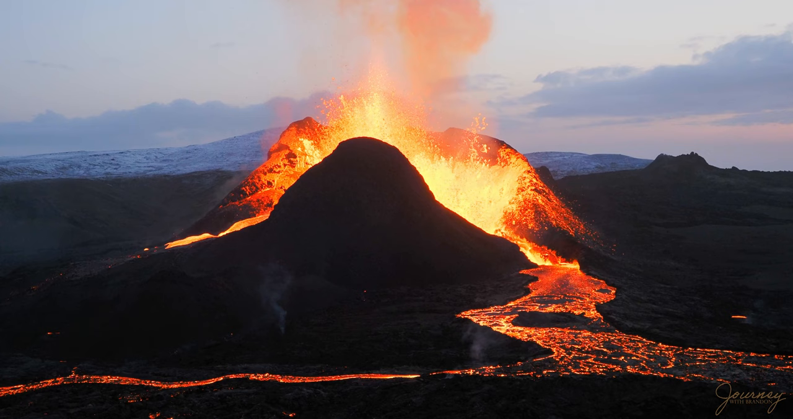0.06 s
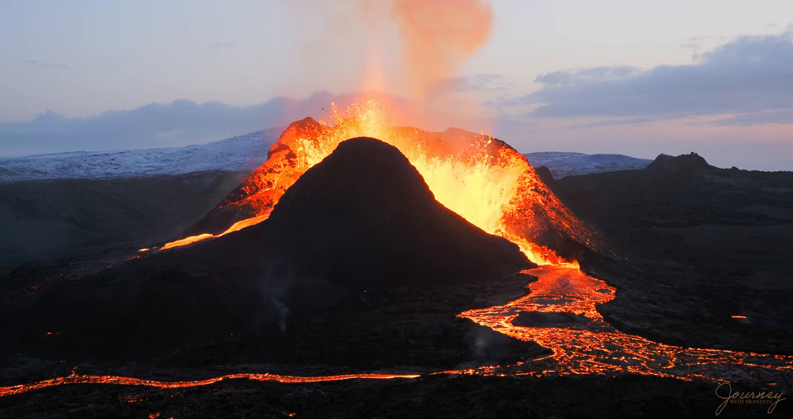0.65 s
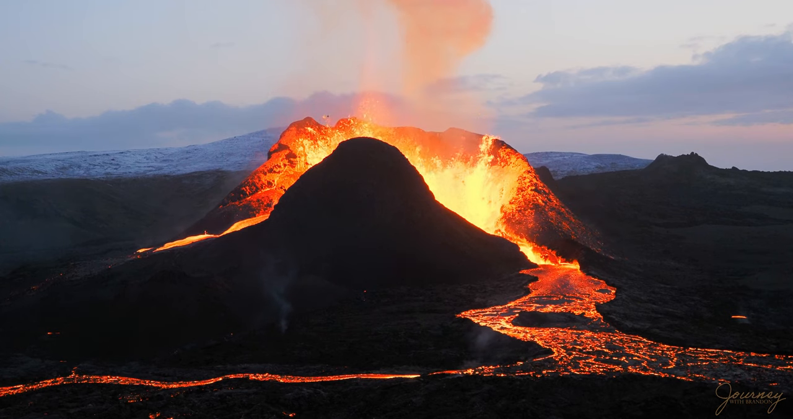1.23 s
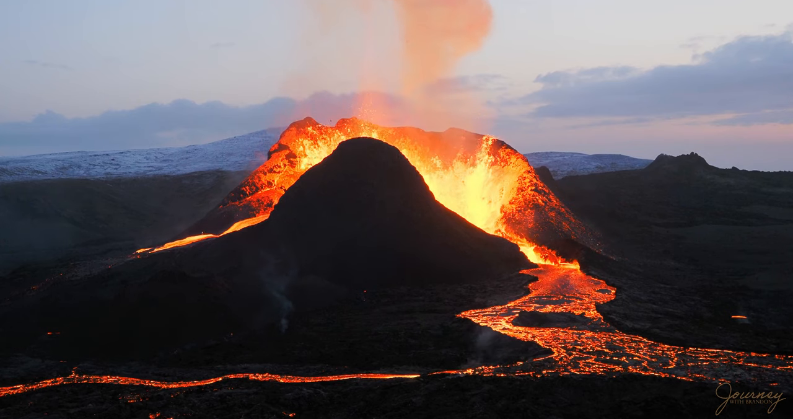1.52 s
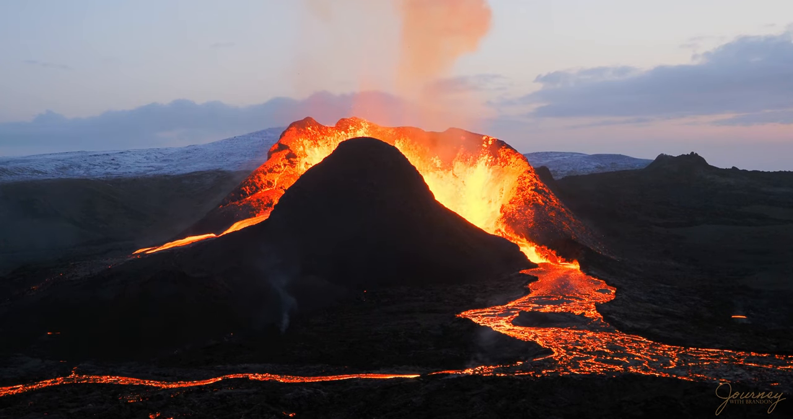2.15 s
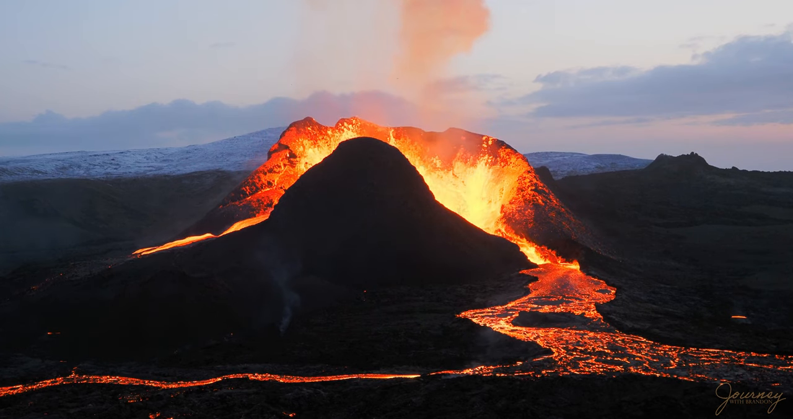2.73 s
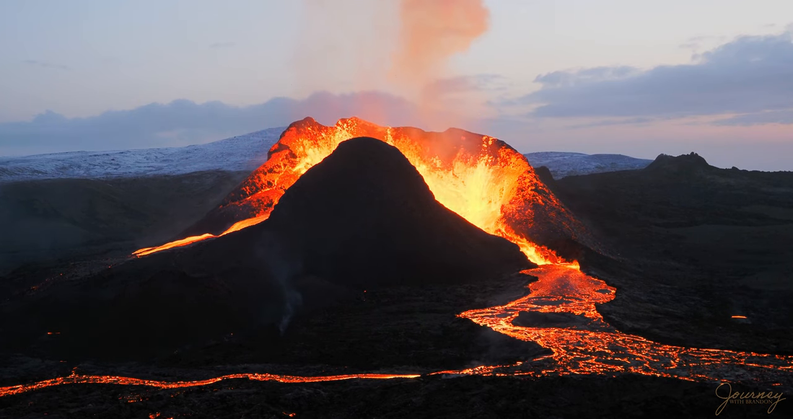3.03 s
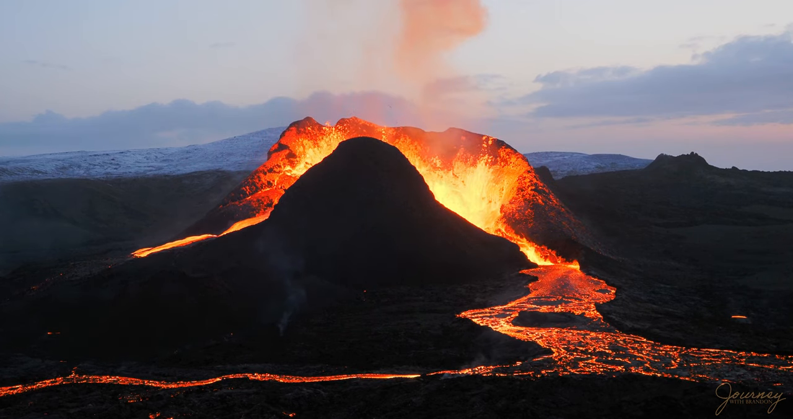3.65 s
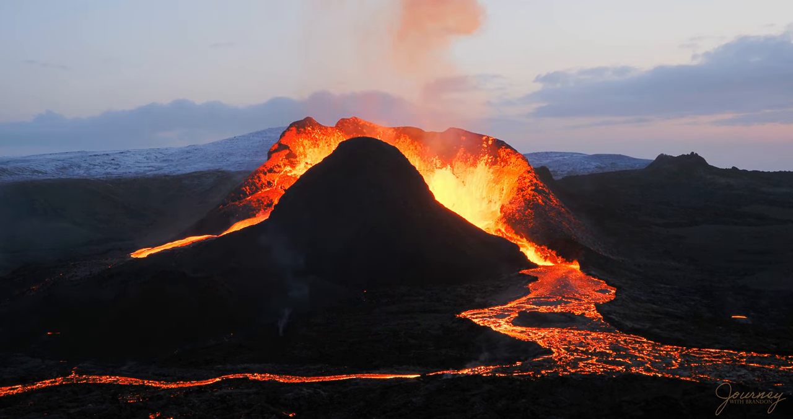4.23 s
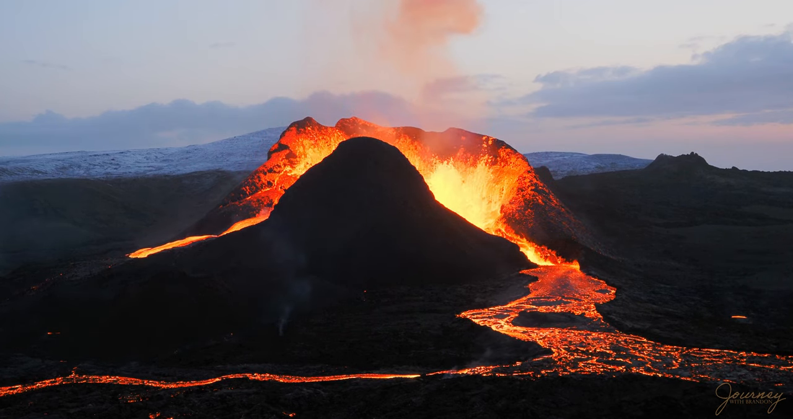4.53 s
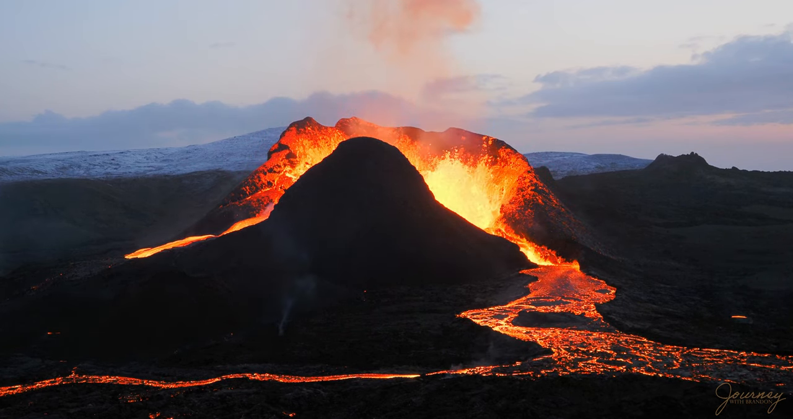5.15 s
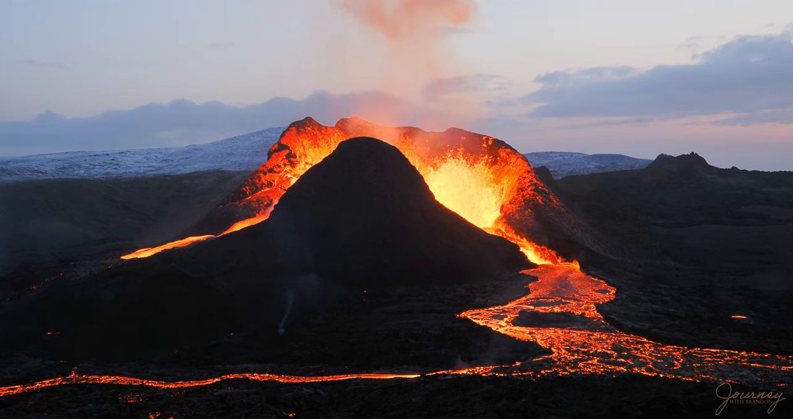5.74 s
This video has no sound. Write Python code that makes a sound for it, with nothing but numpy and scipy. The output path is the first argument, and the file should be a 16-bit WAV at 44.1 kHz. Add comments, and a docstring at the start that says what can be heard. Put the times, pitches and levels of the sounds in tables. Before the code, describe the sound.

Heard from a distance in an open landscape, an erupting volcano gives a continuous low roar of churning lava, booming bubbles and rushing gas. One big bubble thuds early and the eruption swells, then gradually sinks amid softer thuds and slumps. A few gas pockets whoosh out as it briefly rises again late on. Underneath lies a soft lava hiss, with barely audible wind and grit near the microphone.

```python
"""A deep, booming roar comes first: a lava fountain in its crater, far off across open ground. Churning melt
rumbles, countless gas bubbles burst and boom in the vent, and gas rushes above them. Large bubbles thud out
singly, gas pockets whoosh and slabs of melt slump back with a whump. A steadier, higher hiss rides on top of
the gas; close by, light wind sizzles and grit gives a few faint crackles."""
import sys
import numpy as np
from scipy import signal
from scipy.fft import rfft, irfft
from scipy.io import wavfile

SR = 44100
rng = np.random.default_rng(int(sys.argv[2]) if len(sys.argv) > 2 else 0)


def dump_mix(stems):
    """Bounce the given channels to the path in sys.argv[1] as a 16-bit WAV at rate SR."""
    frames = np.atleast_2d(stems).T  # one column per channel
    limited = np.clip(frames, -1, 1)  # hard clip at full scale
    pcm = np.round(limited * 32767).astype(np.int16)
    wavfile.write(sys.argv[1], SR, pcm)


N = 263718
TIME, FREQ = np.arange(N) / SR, np.fft.rfftfreq(N, 1 / SR)


def gain_of(db):
    """Decibels to amplitude."""
    return 10 ** (np.asarray(db) / 20)


def unit_rms(x):
    """Scales to rms 1."""
    return x / np.sqrt(np.mean(x ** 2) + 1e-20)


def eq_db(curve):
    """An EQ curve at every frequency bin, drawn on a log-frequency axis."""
    hz, db = np.transpose(curve)
    return np.interp(np.log(FREQ + 1), np.log(hz + 1), db)


def colour(x, curve):
    """Filters through an EQ curve; rms 1."""
    return unit_rms(irfft(rfft(x) * gain_of(eq_db(curve)), N))


def follow(rows, column=1):
    """One column of an automation table at every sample."""
    rows = np.asarray(rows)
    return np.interp(TIME, rows[:, 0], rows[:, column])


def bump(s, half_width_s):
    """A bell-shaped envelope that peaks at time s."""
    return np.exp(-((TIME - s) / half_width_s) ** 2)


def swelling(s, attack_s, sharpness):
    """An envelope that rises from time s to 1, then sinks."""
    age = np.maximum(TIME - s, 0) / attack_s
    return (age * np.exp(1 - age)) ** sharpness


def wander(rate_hz):
    """Smooth random modulation up to about rate_hz; rms 1."""
    band = np.exp(-(FREQ / rate_hz) ** 2) * (FREQ > rate_hz / 10)
    return unit_rms(irfft(rfft(rng.standard_normal(N)) * band, N))


def pops(per_s, spread_db):
    """Two trains of dense random impulses, most small and a few large."""
    size = gain_of(spread_db * np.minimum(rng.exponential(1, (2, N)), 4))
    polarity = rng.choice([-1, 1], (2, N))
    fires = rng.random((2, N)) < per_s / SR
    return unit_rms(size * polarity * fires)


def resonate(x, hz, width_hz):
    """A resonance of gain 1 that follows the curve hz."""
    turn = np.exp(2j * np.pi * np.cumsum(hz) / SR)
    pole = np.exp(-np.pi * width_hz / SR)
    return 2 * (turn * signal.lfilter([1 - pole], [1, -pole], x / turn)).real


def add(mix, s, sound):
    """Mixes a sound in at time s."""
    part = mix[max(round(s * SR), 0):][:len(sound)]
    part += sound[:len(part)]


# Low-end EQ of the melt, shared with the slumps: f/Hz, relative level/dB
RUMBLE_EQ = [(12, -20.5), (25, -11), (42, -1), (63, -0.5), (100, -2), (150, -2), (215, -11.5), (320, -11.5),
             (700, -51.5), (2000, -92)]
# Fader ride on the rumble: t/s, relative level/dB
RUMBLE_RIDE = [(0, 4), (.4, 5.5), (.7, 7.5), (1.1, 7), (1.5, 5), (1.9, 3.5), (2.25, -0.3), (2.8, -1),
               (3.4, -3), (4.1, -5.2), (4.55, -2.5), (5.25, 0), (5.5, -4), (5.98, -4.5)]
def churn(level_db=-30.0, heave_db=0.5):
    """Heavy melt heaves in the crater: a deep, dense rumble that swells and ebbs."""
    rumble = colour(rng.standard_normal((2, N)), RUMBLE_EQ)
    return rumble * gain_of(level_db + follow(RUMBLE_RIDE) + heave_db * wander(6.7))


# Low-mid body of the bursts: f/Hz, relative level/dB
BOOM_EQ = [(100, -32), (215, -4.5), (275, -0.5), (330, -1), (470, -1.5), (600, -9.5), (900, -22.5),
           (2000, -52), (5000, -93.5)]
# The eruption surges, ebbs and rallies; also drives gas and steam: t/s, melt vigour/dB, gas flow/dB
ERUPTION_ARC = [(0.0, 2.5, 4.5), (0.35, 3, 1.5), (0.65, 7.5, 4.0), (1.35, 7, 4.0), (2.0, 3, -0.5),
                (2.45, 0.9, -1.5), (2.72, 0.5, -1.7), (2.84, 1.5, 0.2), (3.02, 0.5, 0.5),
                (3.12, -2.0, -1.7), (4.05, -6.5, -2.5), (4.5, -4, -0.5), (4.85, -2, -0.5), (5.05, -2.5, 0),
                (5.25, 1, -0.5), (5.5, -3, -1.2), (5.98, -5.0, -3)]
# Accents where clusters of bubbles break together: t/s, extra vigour/dB
CLUSTERS = [(.86, 0.5), (1.05, 1.5), (1.29, 3.5), (1.64, 2), (2.13, 0)]
# The vent's hollow note, gliding as the melt heaves: t/s, f/Hz
VENT_PITCH = [(0, 310), (.55, 296.5), (.88, 319), (1.06, 400), (1.18, 332), (1.31, 333), (1.47, 401),
              (1.75, 287), (1.9, 385), (2.13, 311), (2.3, 397), (2.6, 287), (2.75, 409), (3.0, 441),
              (3.3, 338), (4.3, 302), (5.2, 380), (5.6, 435), (5.98, 406)]
def boil(level_db=-29.0, swell=0.86, hollow=0.46, hollow_growth=0.86, throb_db=-1.2):
    """A swarm of bursting bubbles; the harder they burst, the more the hollow of the vent rings."""
    bursts = colour(pops(per_s=3500, spread_db=1.5), BOOM_EQ)
    accent_db = sum(db * bump(s, half_width_s=0.032) for s, db in CLUSTERS)
    vigour_db = follow(ERUPTION_ARC, column=1) + accent_db
    ring = resonate(bursts, follow(VENT_PITCH), width_hz=45)
    ring_gain = hollow * gain_of(hollow_growth * vigour_db)
    boom = unit_rms((bursts + ring_gain * ring) / np.sqrt(1 + ring_gain))
    return boom * gain_of(level_db + swell * vigour_db + throb_db * wander(55))


# Midrange roar of the gas: f/Hz, relative level/dB
RUSH_EQ = [(100, -26), (215, -11), (400, -1), (560, -2), (800, -0.5), (1050, -5.5), (1330, -8.5),
           (1750, -14), (2200, -22), (2900, -30.5), (3600, -43), (4500, -55.5), (6000, -81), (16000, -100)]
def gas(level_db=-31.0, swell=1.1, flutter_db=0.5):
    """Gas tears through the spray in tiny shocks; distance takes the treble."""
    rush = colour(pops(per_s=8000, spread_db=2.0), RUSH_EQ)
    flow_db = follow(ERUPTION_ARC, column=2)
    return rush * gain_of(level_db + swell * flow_db + flutter_db * wander(22))


# Upper-mid presence of the steam: f/Hz, relative level/dB
STEAM_EQ = [(500, -12), (2000, 4), (2900, -3.5), (3600, -11), (4500, -20), (5500, -28), (7500, -49),
            (16000, -79)]
def steam(level_db=-54, swell=0.33):
    """The gas jet's upper hiss is steadier and higher, and only loosely follows the vent."""
    hiss = colour(rng.standard_normal((2, N)), STEAM_EQ)
    return hiss * gain_of(level_db + swell * follow(ERUPTION_ARC, column=2))


# Airy bed of the wind: f/Hz, relative level/dB
HISS_EQ = [(1000, -12), (4000, 3), (7000, 0), (10500, -1), (12500, -1.5), (15500, -5)]
# Bright top of the gusts: f/Hz, relative level/dB
SIZZLE_EQ = [(3000, -8.5), (5000, -0.5), (7500, -3), (10800, 0), (12500, -5), (15500, -11.5)]
# Soft, overlapping gusts: crest t/s, relative level/dB, half width/s
GUST_CUES = [(1.6, -5.5, .25), (2.6, -2.5, 0.7), (2.63, -2, .065), (2.82, -1, .055), (3.04, -2.5, .18)]
def wind(level_db=-76.0, gust_db=-73.0, flicker_db=0.5, flutter_db=0.7):
    """Light wind hisses thinly, and soft gusts bring a fluttering sizzle."""
    hiss = colour(rng.standard_normal((2, N)), HISS_EQ)
    hiss *= gain_of(level_db + flicker_db * wander(70))
    gust = np.sqrt(sum((gain_of(db) * bump(s, half_s)) ** 2 for s, db, half_s in GUST_CUES))
    sizzle = colour(pops(per_s=6000, spread_db=1.6), SIZZLE_EQ)
    return hiss + gust * sizzle * gain_of(gust_db + flutter_db * wander(60))


# Single hits of large bubbles: t/s, envelope peak level/dB, f/Hz, attack/cycles
THUD_CUES = [(0.611, -15, 420, .8), (0.69, 0, 345, .85), (0.6968, -8.5, 480, 1), (.6965, -14.5, 150, 1.1),
             (0.84, -16, 315, 6), (1.285, -16, 335, 5), (1.624, -13, 290, 1), (2.11, -21, 310, 5),
             (2.185, -19.5, 155, 2.5), (2.595, -20, 144, 2), (2.744, -20, 500, 1), (4.901, -17.5, 105, .8)]
def thuds(wall_db=-13, wall_t60_s=0.1):
    """A large bubble swells, overshoots and collapses in a few cycles; crater walls scatter the thud."""
    t, direct = np.arange(SR // 4) / SR, np.zeros(N)
    for s, db, hz, cycles in THUD_CUES:
        age = hz * t / cycles
        envelope = age ** 2 * np.exp(1 - age ** 2)
        add(direct, s, gain_of(db) * envelope * np.sin(2 * np.pi * hz * t))
    walls = rng.standard_normal((2, len(t))) * gain_of(-60 * t / wall_t60_s)
    walls /= np.linalg.norm(walls[0])
    echo = signal.fftconvolve(direct[None], walls, axes=1)[:, :N]
    return np.array([direct, np.zeros(N)]) + gain_of(wall_db) * echo  # mid, side


# Dull tone of a spurt: f/Hz, relative level/dB
WHOOSH_EQ = [(100, -18.5), (250, -15), (400, 3), (1000, -1), (1450, -8.5), (2200, -17), (3600, -34),
             (6000, -72), (16000, -100)]
# Gas blowouts: t/s, relative level/dB, attack/s, ring f/Hz
SPURT_CUES = [(0.666, -35.5, .045, 1700), (2.154, -33.5, 0.082, 800), (4.859, -30, .04, 520),
              (5.168, -25, 0.043, 795), (5.253, -31.5, .038, 557)]
def spurts(level_db=1.4, hollow=0.67):
    """A pocket of gas blows out in a dull whoosh, coloured by the size of its opening."""
    whoosh = colour(pops(per_s=3000, spread_db=2.0), WHOOSH_EQ)
    out = np.zeros((2, N))
    for s, db, attack_s, hz in SPURT_CUES:
        ring = unit_rms(resonate(whoosh, np.full(N, hz), width_hz=500))
        envelope = gain_of(db + level_db) * swelling(s, attack_s, sharpness=3.2)
        out += envelope * unit_rms(whoosh + hollow * ring)
    return out


# Low whumps of falling slabs: t/s, level/dB, attack/s
SLUMP_CUES = [(0.671, -26.5, .025), (1.586, -27, 0.023), (1.798, -27, .035), (1.973, -28.5, 0.026),
              (2.152, -27, .036), (4.78, -28, .028), (4.899, -29, .036), (5.159, -31.5, 0.035)]
def slumps(sharpness=8.1):
    """Heavy melt falls back into the crater and shakes the air."""
    envelope = sum(gain_of(db) * swelling(s, attack_s, sharpness) for s, db, attack_s in SLUMP_CUES)
    return envelope * colour(rng.standard_normal((2, N)), RUMBLE_EQ)


# Close-up ticks: t/s, relative level/dB, f/Hz, bandwidth/Hz, decay/s
GRIT_CUES = [(1.6012, -58, 5100, 2500, 0.0022), (1.72, -63.5, 4500, 160, .025),
             (3.269, -57.5, 6200, 5000, .004), (3.7675, -53, 11500, 5000, 0.0013)]
def grit(level_db=-5):
    """Grit gives tiny dry crackles; a narrow-band one rings as a faint chirp."""
    t, out = np.arange(SR // 10) / SR, np.zeros(N)
    for s, db, hz, width_hz, decay_s in GRIT_CUES:
        pitch = np.full(len(t), hz)
        band = resonate(rng.standard_normal(len(t)), pitch, width_hz)
        tick = unit_rms(resonate(band, pitch, width_hz))  # second pass steepens the skirts
        add(out, s, gain_of(db + level_db) * tick * np.exp(-t / decay_s))
    return out


# Stereo width: f/Hz, side gain/dB
SIDE_EQ = [(40, -33.5), (100, -22.5), (320, -22), (490, -15.5), (750, -21), (1750, -14), (2700, -14),
           (3200, -14.5), (5500, -6.5), (12000, -5.5)]
# Balance: f/Hz, left over right level/dB
PAN_EQ = [(40, .3), (120, 1.1), (320, -.7), (500, 0.35), (1500, .9), (3000, .5), (5000, .1)]
def outdoors(mid_side):
    """Direct sound in the middle, and a weaker part scattered by the land to the sides."""
    edge_fades = signal.windows.tukey(N, 400 / N)
    mid, side = rfft(mid_side * edge_fades)
    side *= gain_of(eq_db(SIDE_EQ))
    lean = gain_of(eq_db(PAN_EQ) / 2)
    return irfft(np.array([(mid + side) * lean, (mid - side) / lean]), N)


def scene():
    """The distant lava and the nearby wind spread in stereo, with the grit dead centre."""
    mid_side = churn() + boil() + gas() + steam() + wind() + thuds() + spurts() + slumps()
    return outdoors(mid_side) + grit()


def record(dry, cutoff_hz=15700):
    """A steep high cut on the master."""
    high_cut = signal.firwin(511, cutoff_hz, window=("kaiser", 9), fs=SR)
    return signal.oaconvolve(dry, high_cut[None], "same")


dry = scene()
out = record(dry)
dump_mix(out)
```